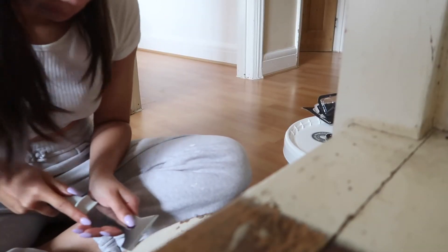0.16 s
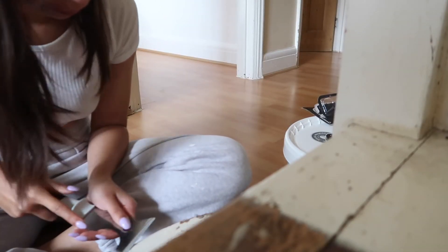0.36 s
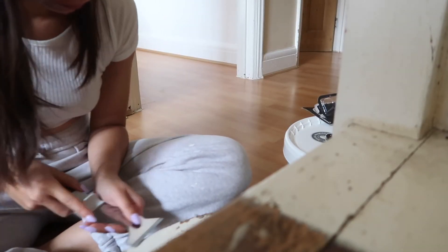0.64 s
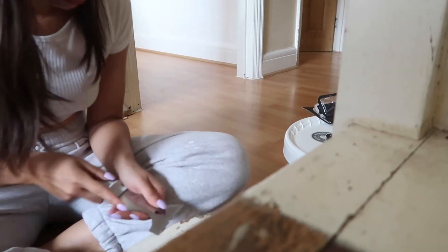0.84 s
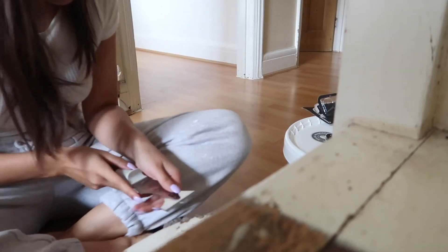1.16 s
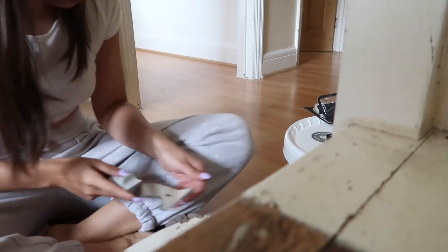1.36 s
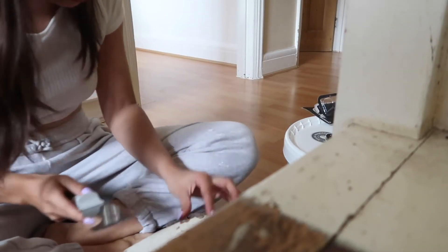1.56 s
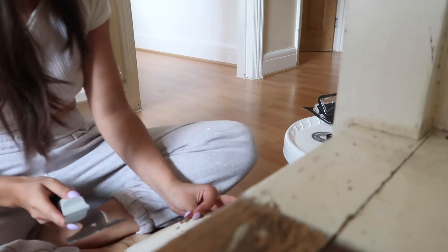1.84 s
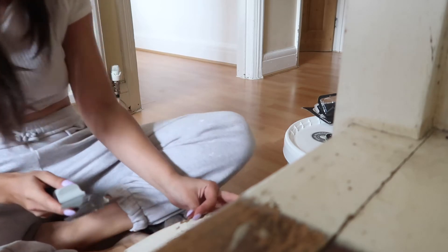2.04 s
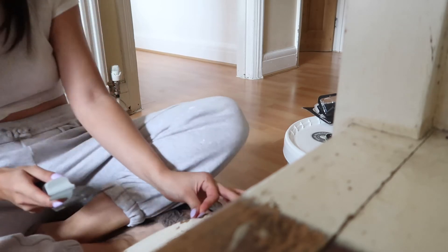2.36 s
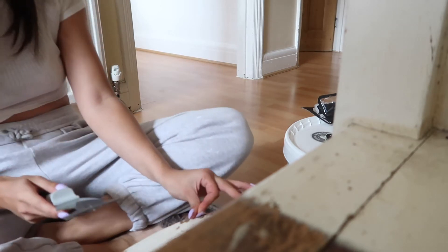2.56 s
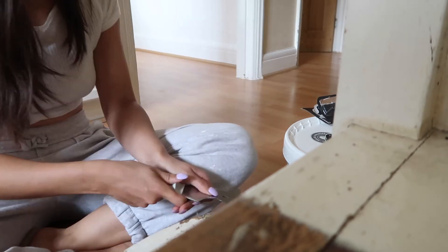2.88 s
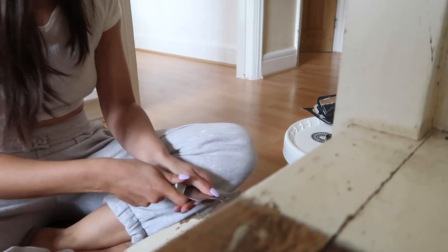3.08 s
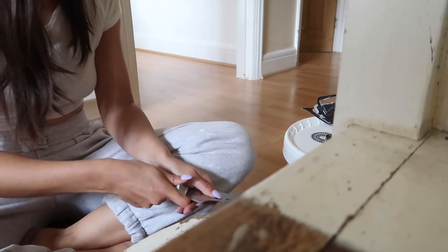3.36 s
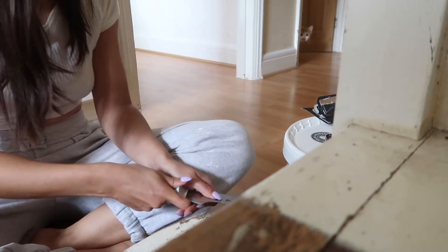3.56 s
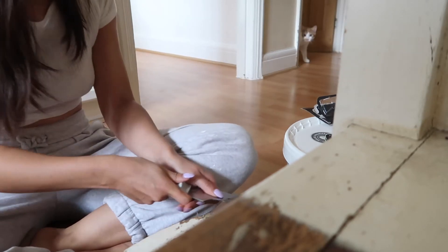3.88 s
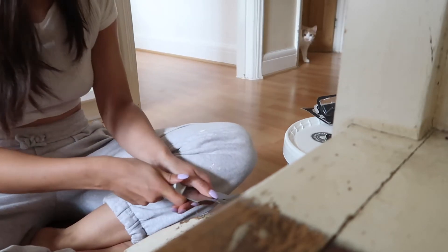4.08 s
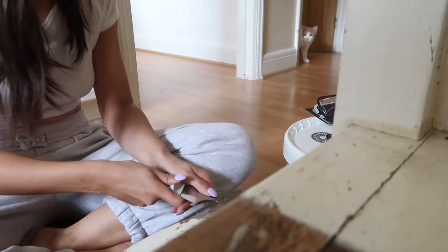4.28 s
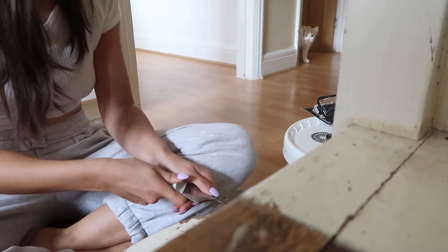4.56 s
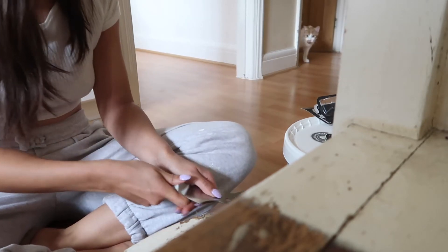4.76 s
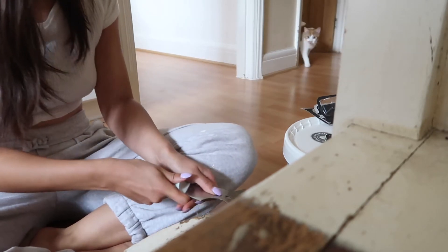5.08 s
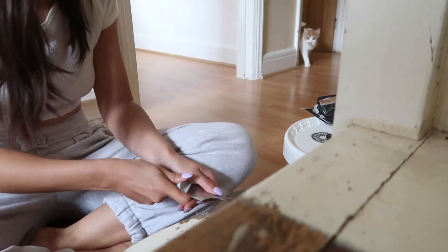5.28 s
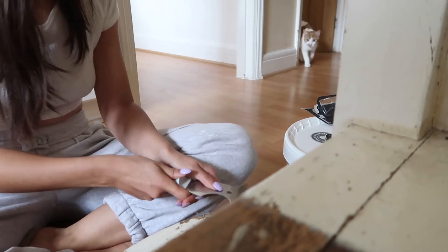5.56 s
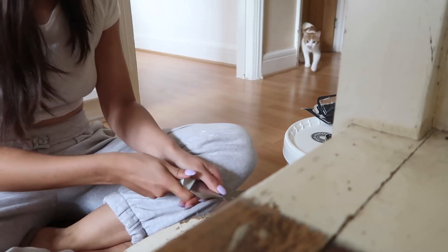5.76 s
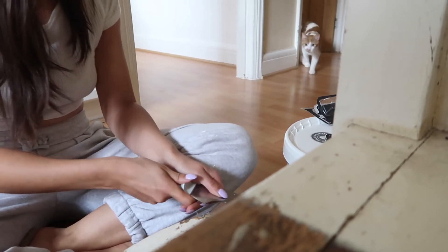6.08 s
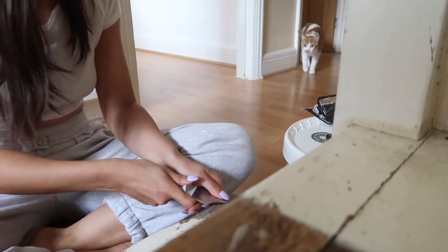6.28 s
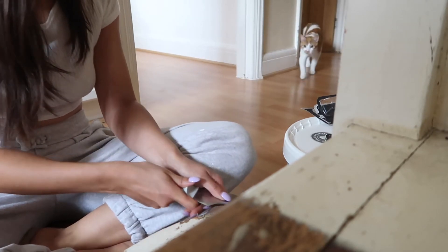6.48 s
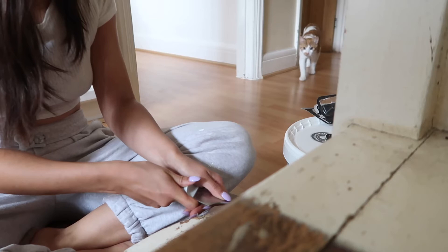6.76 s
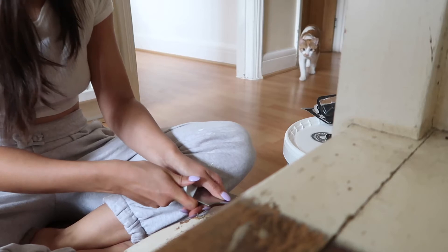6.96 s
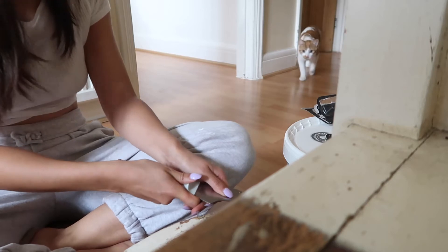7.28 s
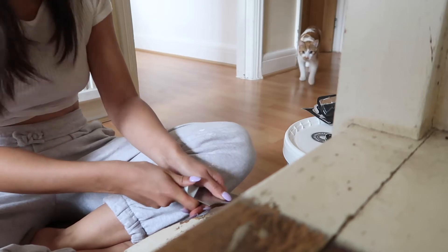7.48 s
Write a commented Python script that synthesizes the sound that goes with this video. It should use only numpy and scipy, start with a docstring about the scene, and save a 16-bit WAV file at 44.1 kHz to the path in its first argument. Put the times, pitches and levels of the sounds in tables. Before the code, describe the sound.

A steel scraper catches and knocks on a hollow painted wooden stair in short irregular strokes, with flake ticks and one loud blade twang.

```python
"""A blow comes first: paint cracks, a hollow stair booms and steel twangs over a dull rub and a low hush.
A scraper is worked under old paint on a wooden stair in a hallway; its strokes judder, chirp and shed flakes.
Between strokes clothes rustle, a soft thump swells dully, and cloth and fingers swish.
Blows ring damped modes of wood and steel, cracks and rustles are coloured noise, strokes are random slips;
a decaying noise tail stands for the reflections from bare walls and floor."""
import sys
import numpy as np
from scipy import signal
from scipy.fft import rfft, irfft, next_fast_len
from scipy.io import wavfile
from scipy.ndimage import uniform_filter1d

SR = 44100
rng = np.random.default_rng(int(sys.argv[2]) if len(sys.argv) > 2 else 0)


def transcribe(signal):
    """Save signal, clipped to [-1, 1], as a 16-bit WAV file at the path in sys.argv[1]."""
    frames = np.atleast_2d(signal).T
    limited = np.clip(frames, -1, 1)
    pcm = np.round(limited * 32767).astype(np.int16)
    wavfile.write(sys.argv[1], SR, pcm)


N = 336417
T = np.arange(int(SR * .75)) / SR  # time axis of one event (s)

# Modes of the swaying flight, its hollow and the tread on top.
# Each row: frequency in Hz, relative level in dB, 60 dB decay time in s.
SWAY_MODES = [(65.1, -3, 0.28), (89.4, -2, 0.48), (111, 0.5, 0.22)]
HOLLOW_MODES = [(129.2, -6, 0.2), (168.5, 3.5, 0.18), (197, -1, 0.15)]
TREAD_MODES = [(245.5, -2.5, 0.1), (297.4, -2, 0.15), (337.8, -9.5, 0.22), (386.6, -14.5, 0.24),
               (426, -9.5, 0.11), (456.5, -3.5, 0.081), (532.3, -15, 0.089), (658, -18, 0.045)]
# Modes of the scraper's edge pressed into the wood, which only clacks.
# Each row: frequency in Hz, relative level in dB, 60 dB decay time in s.
EDGE_MODES = [(1200, -3, 0.013), (2165, 3.5, 0.013), (2650, 1, 0.013), (3330, 3, 0.011)]
# Spectra of cracking paint and of the dense upper wood modes.
# Each row: frequency in Hz, relative spectral density in dB.
PAINT_SPECTRUM = [(300, -4.5), (600, 2.5), (1100, 5.5), (1800, -1.5), (2600, 0), (3400, -5.5), (4300, -7.5),
                  (7000, -16.5), (9000, -28), (11000, -49.5), (14000, -46)]
THUD_SPECTRUM = [(150, -32), (350, 4), (520, -0.5), (750, -8), (1050, -12.5), (1500, -23.5), (2500, -28.5),
                 (5000, -42.5), (12000, -74.5)]


def amp(db):
    """Logarithmic level: decibels to gain."""
    return 10 ** (np.asarray(db) / 20)


def unit(x):
    """Normalisation: scale to rms 1."""
    return x / np.sqrt(np.mean(x ** 2) + 1e-20)


def along(points, hz):
    """Interpolation of (Hz, value) points on a logarithmic frequency axis."""
    f, v = np.transpose(points)
    return np.interp(np.log(hz + 1), np.log(f + 1), v)


def colour(x, points):
    """Minimum-phase filtering: the folded cepstrum makes a causal filter with the gain of (Hz, dB) points."""
    m = 2 * next_fast_len(x.shape[-1] // 2 + 2048, True)
    gain = amp(along(points, np.fft.rfftfreq(m, 1 / SR)))
    cepstrum = irfft(np.log(gain))
    cepstrum[1:m // 2] *= 2
    cepstrum[m // 2 + 1:] = 0
    response = np.exp(rfft(cepstrum))
    return irfft(rfft(x, m) * response, m)[..., :x.shape[-1]]


def add(track, s, sound):
    """Superposition: mix a sound in at time s."""
    i = int(np.clip(s * SR, 0, N - 1))
    track[:, i:i + sound.shape[-1]] += sound[..., :N - i]


def mode_sizes(db):
    """Modal excitation: strengths scatter by about 1 dB with the point of contact; signs alternate."""
    signs = (-1) ** np.arange(len(db))[:, None]
    return amp(db + rng.standard_normal(db.shape)) * signs


def ring(modes, pitch=1, t=T):
    """Modal synthesis: a struck body sounds as a sum of exponentially damped sines."""
    hz, db, t60 = np.transpose(modes)[:, :, None]
    decay = np.exp(-np.log(1000) * t / t60)
    return np.sum(mode_sizes(db) * decay * np.sin(2 * np.pi * hz * pitch * t), axis=0)


def burst(t60, rise):
    """Fracture noise: a fast rise and an exponential decay (both in s) shape white noise."""
    return rng.standard_normal(len(T)) * amp(-60 * T / t60) * (1 - np.exp(-T / rise))


def hall(x, wet_db, build=0.0013):
    """Diffuse reverberation: direct sound plus a fresh noise tail that swells over build (s), as (mid, side)."""
    # Decay of the hallway. Each row: frequency in Hz, 60 dB decay time in s.
    decay_times = [(60, 0.57), (200, 0.45), (450, 0.31), (1100, 0.62), (3000, 0.46), (8000, 0.43)]
    hz, t, z = signal.stft(rng.standard_normal((2, len(T))), SR, nperseg=256)
    decay = amp(-60 * t / along(decay_times, hz)[:, None])
    tail = signal.istft(z * decay, SR, nperseg=256)[1][:, :len(T)]
    tail *= 1 - np.exp(-T / build)
    tail *= amp(wet_db) / np.linalg.norm(tail[0])
    tail[0, 0] += 1  # direct sound, in the middle
    return signal.fftconvolve(x[None], tail, axes=1)[:, :len(x)]


def sized(x, db, length):
    """Onset level: set the mid rms over the first length seconds of a sound."""
    return x * amp(db) / np.sqrt(np.mean(x[0, :int(length * SR) + 1] ** 2) + 1e-20)


def swell(start, end, db, rise, fall):
    """Exponential growth and decay: gain rises to dB at start, holds until end, falls (rates in dB per s)."""
    t = np.arange(N) / SR
    return amp(db - abs(rise) * np.maximum(start - t, 0) - abs(fall) * np.maximum(t - end, 0))


def wood():
    """Impulse response: the whole stair answers one push with all its modes."""
    return amp(1.0) * ring(SWAY_MODES) + ring(HOLLOW_MODES) + amp(-2.0) * ring(TREAD_MODES)


def hush():
    """Stationary noise: the quiet house and microphone hiss, as (mid, side)."""
    # Spectrum of the hush. Each row: frequency in Hz, relative spectral density in dB.
    hush_spectrum = [(15, -23), (25, 1), (80, 2), (237, -3), (472, -9.5), (554, -9.5), (991, -12),
                     (1160, -12.5), (1640, -15.5), (3100, -17.5), (9660, -32), (11900, -38.5), (14000, -59)]
    # Stereo spread. Each row: frequency in Hz, side level relative to mid in dB.
    hush_spread = [(60, -23), (110, -20.5), (200, -5), (370, 2.5), (680, -0.5), (1240, 1), (2280, 0),
                   (4170, 1.5), (7650, 1.5), (14000, 8)]
    mid, side = colour(rng.standard_normal((2, N)), hush_spectrum)
    return amp(-65) / np.std(mid) * np.array([mid, colour(side, hush_spread)])


def handling():
    """Friction noise: cloth brushes as limbs shift; that and the gripping hands rub a rumble out of the stair."""
    # An arm or leg shifts. Each row: time of the fastest motion in s, level in dB.
    shifts = [(1.18, -54.5), (1.71, -63), (2.22, -64.5), (2.73, -74.5)]
    # The hands bear on the stair. Each row: start in s, end in s, level in dB.
    grips = [(0, 0.03, -59.5), (3.048, 7.631, -57.5)]
    # Brushed cloth. Each row: frequency in Hz, relative spectral density in dB.
    cloth_spectrum = [(88, -34), (150, -10.5), (341, 2), (403, -3), (451, 2.5), (597, -7), (3090, -15),
                      (9640, -37), (13000, -64)]
    tremor_db, tremor_s = 2.5, 0.084  # rms waver of the hand pressure, and its smoothing time
    rumble_db = 1  # rumble in the wood relative to the cloth, when a limb shifts
    motion = sum(swell(s, s, db, rise=71, fall=34) for s, db in shifts)
    grip = sum(swell(start, end, db, rise=148, fall=33) for start, end, db in grips)

    fibres = rng.standard_normal(N)
    unevenness = unit(uniform_filter1d(rng.standard_normal(N), size=300))
    brushing = fibres * amp(3.7 * unevenness)
    cloth = unit(hall(colour(brushing, cloth_spectrum), wet_db=2.0))

    waver = unit(uniform_filter1d(rng.standard_normal(N), size=int(tremor_s * SR)))
    damped_wood = wood() * amp(-60 * T / 0.022)  # the palm rests on the tread
    pressure_noise = amp(tremor_db * waver) * rng.standard_normal(N)
    rub = signal.fftconvolve(pressure_noise, damped_wood)[:N]
    return motion * cloth + (grip + amp(rumble_db) * motion) * unit(hall(rub, wet_db=2.5))


def knocks():
    """Impact excitation: each catch cracks paint and knocks the tread; heavier parts of the stair rise slower."""
    # The tool catches or knocks on the stair. Each row: start in s, force in dB,
    # depth in dB (high shoves the whole flight, low raps the tread), thud level in dB,
    # paint crack level in dB, pitch ratio of the wood at that spot.
    blows = [(.001, -63.5, 9.5, -70, -51.5, 0.93), (0.798, -53, 4, -43.5, -56, 0.9),
             (0.8098, -49.5, -5, -45.5, -57, 1.1), (1.057, -59.5, -17, -54.5, -76, 0.96),
             (1.0781, -47.5, -6, -53, -82, 1.03), (2.002, -66, -13, -64, -76, 1.05),
             (2.1785, -65, -15.5, -69, -76, 1), (2.814, -64, -6.5, -65, -76, 0.98),
             (2.894, -63, -5, -53, -71, 1.07), (2.902, -34.5, -9.5, -41, -58, 1.04),
             (3.0324, -45, -2.5, -68, -73, 0.97), (3.222, -41.5, 3.5, -53.5, -55.5, 0.94),
             (3.2479, -39, -.5, -55, -48, 1.1), (3.413, -42.5, 5, -56, -57.5, 0.98),
             (3.6374, -30, 0.5, -50.5, -48, 0.94), (3.6672, -24, -4.5, -42.5, -40, 1.01),
             (3.697, -32.5, -10.5, -36.5, -38, 0.99), (3.714, -28, -5, -46, -46, 1),
             (4.057, -39.5, -5, -57.5, -60, 1), (4.31, -54.5, -2, -61.5, -62.5, 1),
             (4.396, -52, -9.5, -58, -73, 1.05), (4.467, -48.5, -1.5, -68, -59.5, 0.99),
             (4.6163, -50.5, 0.5, -65, -55, 1.01), (4.817, -35, 0.5, -47.5, -46, 1),
             (4.858, -29, -2.5, -46, -37, 0.96), (4.8875, -25, -8, -32.5, -34.5, 0.99),
             (5.186, -34.5, 3.5, -48.5, -67, 1.01), (5.545, -52.5, 1, -62, -61.5, 1.07),
             (5.835, -53.5, -6.5, -69, -57.5, 1), (5.9211, -50, 3.5, -70, -58, 1),
             (6.258, -50, 3.5, -62, -83, 0.99), (6.528, -28.5, -7.5, -43, -31.5, 1.037),
             (6.829, -53, 1, -54.5, -70.5, 1.07), (7.131, -35, -7, -43.5, -59, 1.055),
             (7.2623, -28.5, -2.5, -41.5, -37.5, 1)]
    deep_db, boom_gain_db, tread_gain_db = -1, 3, -7  # sway, boom and tread ring relative to force
    boom_force_db, boom_growth = -36, 0.19  # the boom's share grows with force (dB per dB) about this force
    out = np.zeros((2, N))
    for s, force_db, depth_db, thud_db, crack_db, pitch in blows:
        sway_db = force_db + depth_db + deep_db
        boom_db = force_db + boom_gain_db + boom_growth * (force_db - boom_force_db)
        tread_db = force_db - depth_db + tread_gain_db

        sway = ring(SWAY_MODES) * (1 - np.exp(-T / 0.0092))
        boom = ring(HOLLOW_MODES, pitch) * (1 - np.exp(-T / 0.0065))
        tread = ring(TREAD_MODES, pitch) * (1 - np.exp(-T / 0.0012))
        thud = colour(burst(t60=0.038, rise=0.0017), THUD_SPECTRUM)
        paint = unit(colour(burst(t60=0.026, rise=0.00042), PAINT_SPECTRUM))
        clack = unit(ring(EDGE_MODES) * amp(-60 * T / 0.01))
        crack = paint + amp(-5) * clack

        add(out, s, sized(hall(sway, wet_db=-9.0), sway_db, length=0.049))
        add(out, s, sized(hall(boom, wet_db=-10.5), boom_db, length=0.015))
        add(out, s, sized(hall(tread, wet_db=0.5), tread_db, length=0.035))
        add(out, s, sized(hall(thud, wet_db=2.5), thud_db, length=0.046))
        add(out, s, sized(hall(crack, wet_db=0.5, build=0.0026), crack_db, length=0.0039))
    return out


def blade(modes):
    """Frequency modulation of modes: each wavers in pitch as the fingers and the wood press on the blade."""
    bend = 0.0051  # rms share by which the pitch is bent
    hz, db, t60 = np.transpose(modes)[:, :, None]
    waver = unit(uniform_filter1d(rng.standard_normal((len(modes), len(T))), size=400))
    phase = 2 * np.pi * np.cumsum(hz * (1 + bend * waver), axis=1) / SR
    decay = np.exp(-np.log(1000) * T / t60)
    return np.sum(mode_sizes(db) * decay * np.sin(phase), axis=0)


def rattle():
    """Repeated impact: quick, uneven touches of steel on wood at random times die away."""
    # The loose blade on the tread. Each row: frequency in Hz, relative spectral density in dB.
    rattle_spectrum = [(200, -25), (330, 4), (520, -10), (720, -7.5), (880, 0.5), (1050, 7.5), (1300, -6.5),
                       (1580, -1.5), (1850, -10), (2130, -6), (2350, -19), (2600, -4.5), (3150, -26),
                       (3600, -13.5), (4300, -23.5), (5400, -38.5), (12000, -68)]
    touches_per_s, t60, scatter_db = 420, 0.22, 3.5
    touches = rng.random(len(T)) < touches_per_s / SR
    size = rng.choice([-1, 1], len(T)) * amp(scatter_db * rng.standard_normal(len(T)))
    return colour(touches * size * amp(-60 * T / t60), rattle_spectrum)


def twangs():
    """Release of elastic energy: the flexed blade snaps straight, rattles, and rings on as the grip allows."""
    # The blade springs free. Each row: start in s, level in dB, treble in dB (low for a soft contact),
    # lingering ring in dB relative to the level (low in a tight grip), rattle level in dB.
    releases = [(.002, -55, 6, -22, -59), (.106, -54.5, -4.5, -15, -63), (.178, -53, -12, -6.5, -60),
                (.222, -50.5, -8, -16, -63), (.362, -61.5, -26, -25, -73), (.798, -45, -23, -27, -61),
                (.811, -35, -17.5, -24, -53), (3.914, -41, -13, -20, -54), (3.934, -28.5, -28, -29, -53),
                (3.959, -39.5, -13, -25, -49), (3.985, -49, -16, -25, -56), (4.009, -35.5, -25, -26, -53),
                (4.119, -55, -21, -24, -65), (5.128, -19.5, -2.5, -14, -28)]
    # The blade damped by the hand, and the partials that linger in a loose grip.
    # Each row: frequency in Hz, relative level in dB, 60 dB decay time in s.
    steel_modes = [(293.3, 2, 0.093), (343.4, 4.5, 0.096), (837, -2, 0.032), (974, -5, 0.05),
                   (1035, -4, 0.076), (1610, -9, 0.025), (2134, -2, 0.029), (2544, 2, 0.02),
                   (2633, 3, 0.046), (2830, 0.5, 0.017), (3490, -6.5, 0.022)]
    linger_modes = [(325.5, 7.5, 0.3), (924, -4.5, 0.38), (1016, 3.5, 0.52), (1078, -1, 0.36),
                    (2574, -1.5, 0.81), (2650, -8, .6)]
    # Steel slapping wood. Each row: frequency in Hz, relative spectral density in dB.
    slap_spectrum = [(60, -17), (200, -6), (450, -26), (800, 2), (1150, -2), (1450, -3.5), (1900, -9),
                     (2700, -2), (3250, -20), (3900, -15), (4800, -28), (5400, -33.5), (8000, -39),
                     (10500, -61), (14000, -68)]
    sag_s_per_db = 0.25
    out = np.zeros((2, N))
    for s, db, treble_db, linger_db, rattle_db in releases:
        contact = [(700, 0.0066), (2500, treble_db)]
        rattle_contact = [(1000, 0.0077), (2500, treble_db / 2)]
        # the gain sags from 1, faster when the treble is near 0 dB
        sag = 2.0 - np.exp(T / (sag_s_per_db * (1 + abs(treble_db))))

        slap = unit(colour(burst(t60=0.018, rise=0.00018), slap_spectrum))
        steel = unit(blade(steel_modes)) + amp(-6) * slap
        twang = colour(steel * sag, contact)
        add(out, s, sized(hall(twang, wet_db=-1.5, build=0.0055), db, length=0.015))

        linger = colour(blade(linger_modes) * sag, contact)
        add(out, s, sized(hall(linger, wet_db=-4.5), db + linger_db, length=0.014))

        loose = colour(rattle(), rattle_contact)
        add(out, s, sized(hall(loose, wet_db=-2), rattle_db, length=0.013))
    return out


def clacks(slips):
    """Length and pitch: the free length of the edge, and so its pitch, changes with each bite."""
    bite_spread = 0.16  # scale of the change in pitch, as a share
    out, life = np.zeros((1, N)), T[:SR // 50]
    for i in np.flatnonzero(slips):
        pitch = 1 + bite_spread * rng.uniform(-1.12, 1)
        add(out, i / SR, slips[i] * ring(EDGE_MODES, pitch, life))
    return out[0, :len(T)]


def strokes():
    """Stick-slip friction: uneven random slips crumble the paint, clack the edge and shake the wood."""
    # The edge slides through paint. Each row: start in s, length in s (sound stops at 0.75 s at the latest),
    # grit level in dB, judder level in dB.
    slides = [(0.124, 0.11, -67, -74), (3.63, 0.058, -50, -34.5), (3.667, 0.073, -39.5, -28),
              (3.88, 0.1, -51, -47.5), (4.44, 0.21, -76, -53), (4.848, 0.032, -35, -31.5),
              (4.878, 0.038, -36.5, -28), (4.92, 0.3, -56.5, -45.5), (5.858, 0.12, -66.5, -47),
              (6.532, 0.038, -43, -29), (6.821, 0.063, -66, -53.5), (7.266, .05, -54.5, -39),
              (7.381, 1, -60.5, -47.5)]
    slips_per_s, scatter_db = 320, 4
    out = np.zeros((2, N))
    for s, length, grit_db, judder_db in slides:
        pressure = np.sqrt(np.abs(np.sin(np.pi * np.minimum(T / length, 1))))
        slip_now = rng.random(len(T)) < slips_per_s / SR
        slips = pressure * slip_now * amp(scatter_db * rng.standard_normal(len(T)))
        crumbs = slips + 0.06 * pressure * rng.standard_normal(len(T))
        grit = unit(colour(crumbs, PAINT_SPECTRUM)) + amp(-6.0) * unit(clacks(slips))
        shake = signal.fftconvolve(slips, wood())[:len(T)]
        judder = unit(shake) + amp(-12.0) * unit(colour(crumbs, THUD_SPECTRUM))
        add(out, s, sized(hall(grit, wet_db=-1.0, build=0.002), grit_db, length))
        add(out, s, sized(hall(judder, wet_db=-8.5), judder_db, length))
    return out


def flakes():
    """Brittle fracture: snapping chips give short bright ticks, each with its own level and pitch."""
    # Flakes of paint snap off. Each row: start in s, level in dB, pitch in Hz.
    snaps = [(0.8106, -50.5, 3000), (1.622, -47.5, 2900), (1.7115, -55, 3830), (3.243, -49, 3430),
             (3.258, -51, 4360), (3.677, -37, 3580), (3.689, -42, 2800), (3.714, -53, 2560),
             (3.721, -49, 2620), (3.730, -45.5, 2380), (3.9122, -45, 2450), (3.933, -55, 2856),
             (4.601, -61, 2520), (4.661, -54, 4200), (4.868, -34, 2670), (4.894, -47.5, 3200),
             (5.836, -47.5, 2330), (5.923, -57, 3880), (5.999, -54, 3840), (6.016, -66, 5500),
             (6.307, -58, 4330), (6.367, -58, 4400), (6.529, -37.5, 3400), (6.534, -47.5, 3350),
             (6.548, -42, 2480), (7.419, -54, 5130), (7.433, -63, 5386), (7.537, -64, 2600),
             (7.5722, -47, 4700)]
    # Snapping chip. Each row: frequency in Hz, relative spectral density in dB.
    chip_spectrum = [(500, 10.5), (1500, 15.5), (3500, 10), (6000, 7), (9000, -10.5), (14000, -29)]
    out = np.zeros((2, N))
    for s, db, hz in snaps:
        snap = unit(colour(burst(t60=0.026, rise=0.00021), chip_spectrum))
        tick = snap + amp(-1.5) * unit(ring([(hz, 0, .006)]))
        add(out, s, sized(hall(tick, wet_db=-2.0, build=0.002), db, length=0.003))
    return out


def swishes():
    """Resonance-filtered noise: a soft thump swells dully near 540 Hz; cloth and fingers swish higher up."""
    # Each row: start in s, length in s, centre frequency in Hz, level in dB.
    swells = [(1.065, 0.061, 540, -54), (1.117, 0.37, 2090, -65.5), (1.999, 0.5, 1750, -66.5),
              (2.45, 0.48, 2950, -73.5)]
    sharpness = 1.9  # Q of the resonance
    out = np.zeros((2, N))
    for s, length, hz, db in swells:
        b, a = signal.iirpeak(hz, sharpness, fs=SR)
        band = signal.lfilter(b, a, rng.standard_normal(len(T)))
        band = colour(band, [(4000, 0.5), (9000, -12)])
        band *= np.sin(np.pi * np.minimum(T / length, 1))
        add(out, s, sized(hall(band, wet_db=1), db, length))
    return out


def squeak():
    """Narrow-band friction noise: the edge whistles thinly on a hard patch of paint, then eases off."""
    # Each row: frequency in Hz, relative spectral density in dB.
    squeak_spectrum = [(4700, -39), (5750, -1), (6100, 6), (6450, -9), (7500, -47)]
    whistle = unit(hall(colour(rng.standard_normal(N), squeak_spectrum), wet_db=-2.5))
    return whistle * swell(3.26, 3.26, db=-66, rise=1300, fall=82)


def chirps():
    """Mode locking: slips that lock to a blade mode are heard as a brief tone with jittered pitch."""
    # The edge chatters at one pitch. Each row: start in s, length in s, pitch in Hz, level in dB.
    chatters = [(3.692, 0.017, 2165, -41.5), (3.693, 0.015, 3340, -42.5), (3.81, .03, 2140, -55),
                (3.888, 0.047, 2140, -58), (3.927, 0.032, 2120, -50), (4.289, 0.035, 2274, -66),
                (4.395, 0.0072, 2310, -58), (4.851, 0.017, 2490, -41.5), (7.261, 0.0058, 3360, -45)]
    roughness = 0.024  # rms share by which the pitch jitters
    out = np.zeros((2, N))
    for s, length, hz, db in chatters:
        jitter = roughness * unit(uniform_filter1d(rng.standard_normal(len(T)), size=60))
        phase = 2 * np.pi * np.cumsum(hz * (1 + jitter)) / SR
        tone = np.sin(phase) * np.sin(np.pi * np.minimum(T / length, 1))
        add(out, s, sized(hall(tone, wet_db=-8.5, build=0.0077), db, length))
    return out


def skitter():
    """Granular noise: many tiny random impacts of loose chips on the tread merge into a fine rustle."""
    # Each row: frequency in Hz, relative spectral density in dB.
    skitter_spectrum = [(1500, -30), (3000, 9), (4000, 4), (5500, -5.5), (8000, -15), (13000, -30)]
    impacts_per_s = 1500
    crumbs = rng.standard_normal(N) * (rng.random(N) < impacts_per_s / SR)
    rustle = unit(hall(colour(crumbs, skitter_spectrum), wet_db=-2))
    return rustle * swell(6.7, 6.7, db=-59.5, rise=304, fall=123)


def scene():
    """Mid-side stereo: all sources sit near the middle; mainly the higher reflections spread."""
    # Spread of the reflections. Each row: frequency in Hz, side gain in dB.
    reflection_spread = [(100, -67), (400, -20.5), (1500, -23), (3500, -11.5), (8000, 10)]
    lead_s = 2e-5  # the left microphone hears the stair this much sooner
    work = knocks() + twangs() + flakes() + strokes() + chirps()
    work = work + skitter() + squeak() + handling() + swishes()
    # the sources give almost nothing below 55 Hz
    high_pass = signal.butter(2, 55, "high", fs=SR, output="sos")
    mid, side = signal.sosfilt(high_pass, work)
    # a tiny lead between the microphones is a side signal proportional to the slope
    side = colour(side, reflection_spread) + np.gradient(mid) * SR * lead_s / 2
    mid, side = np.array([mid, side]) + hush()
    return np.array([mid + side, mid - side]) * amp([[.15], [-.15]])  # channel balance in dB


def record(dry):
    """Band limitation: nothing at or above the upper limit passes."""
    top_hz = 14000
    m = next_fast_len(N + SR // 4)
    passes = np.fft.rfftfreq(m, 1 / SR) < top_hz
    return irfft(rfft(dry, m) * passes, m)[:, :N]


dry = scene()
out = record(dry)
transcribe(out)
```